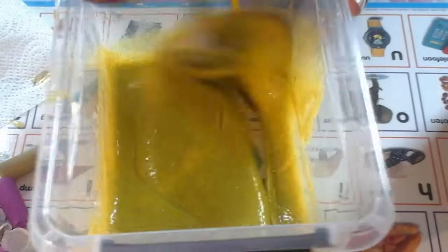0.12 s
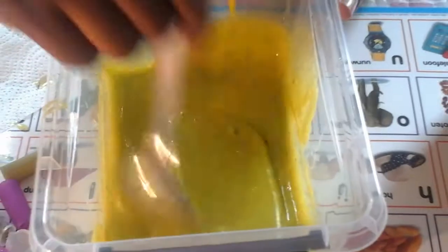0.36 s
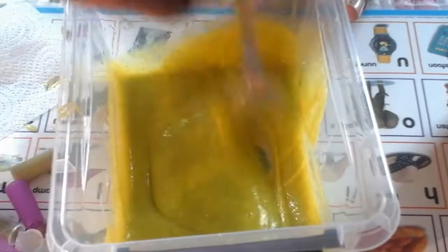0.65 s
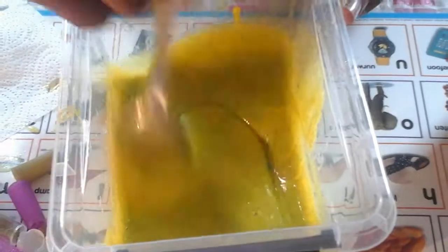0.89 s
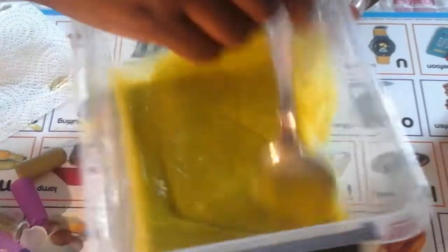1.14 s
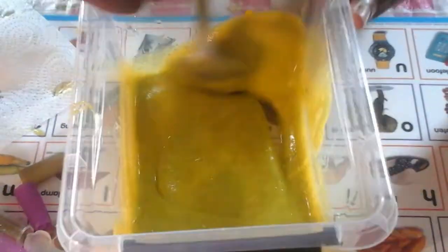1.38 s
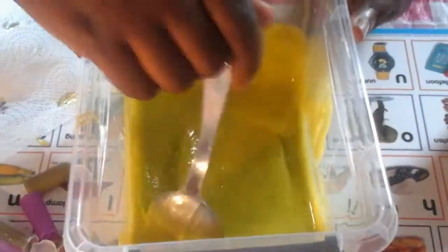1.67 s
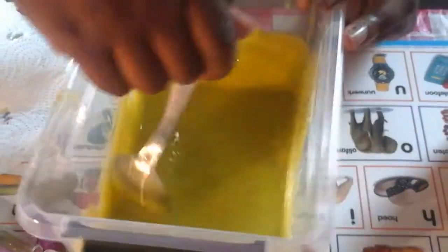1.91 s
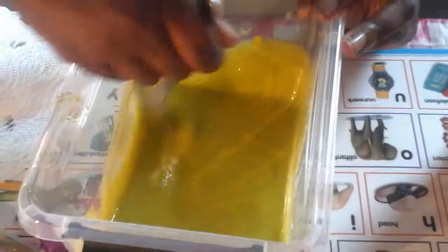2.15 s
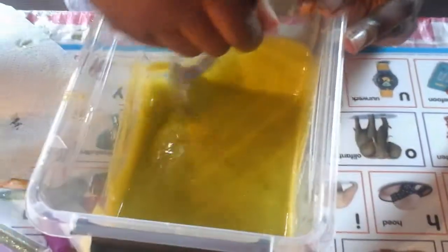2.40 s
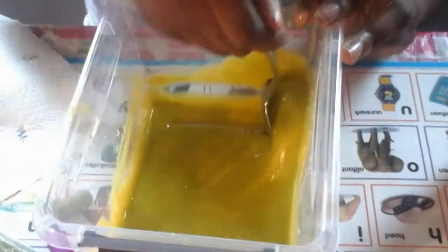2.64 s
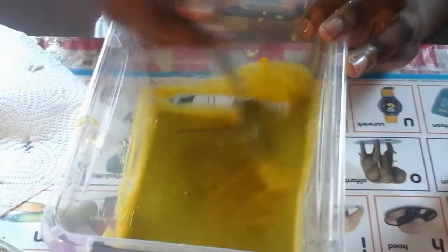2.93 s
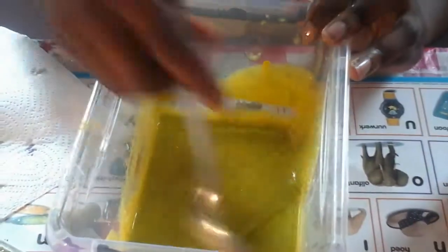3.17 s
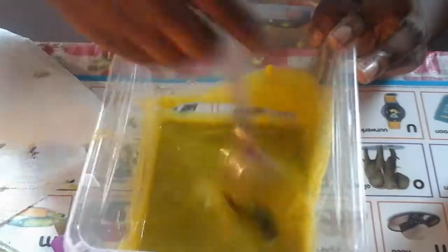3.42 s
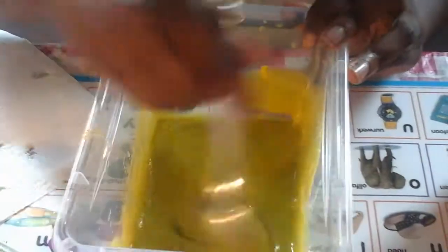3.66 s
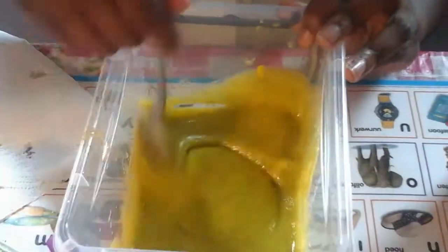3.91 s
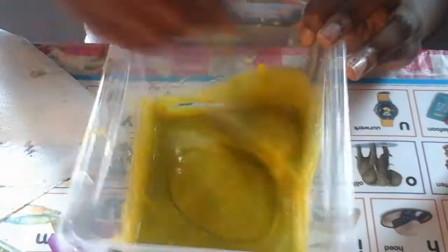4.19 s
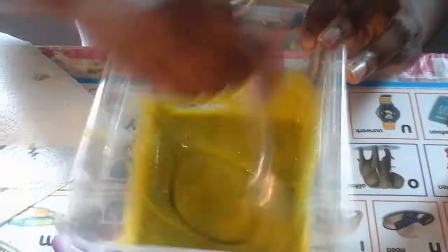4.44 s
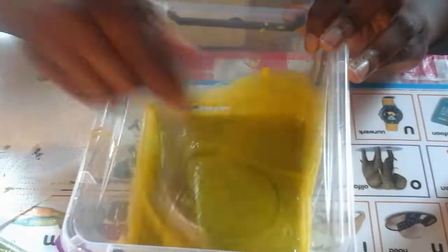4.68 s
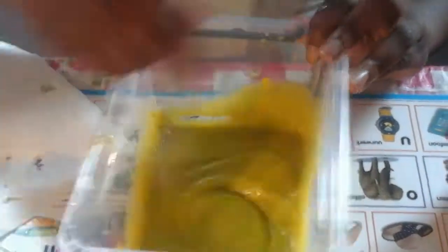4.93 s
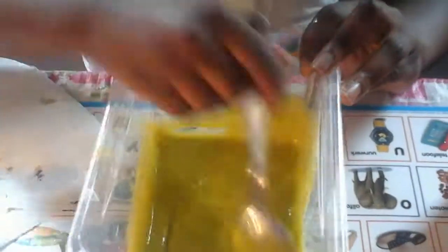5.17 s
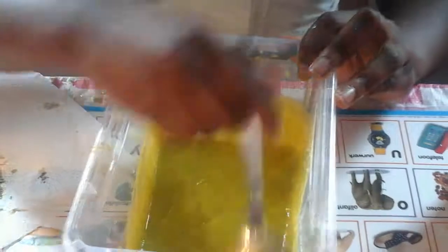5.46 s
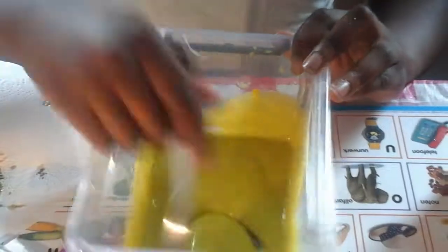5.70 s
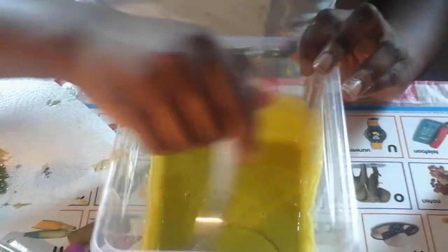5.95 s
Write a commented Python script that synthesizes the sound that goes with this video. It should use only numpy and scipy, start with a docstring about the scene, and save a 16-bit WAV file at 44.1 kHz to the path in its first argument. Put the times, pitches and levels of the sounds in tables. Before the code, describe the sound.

Close, dry indoor sound of slime being stirred with a spoon. Irregular taps on thin plastic, some sharp and some dull and boomy, come with sticky crackles and gooey sucking noises. A vigorous opening gives way to sparse, softer touches, then a short lull; renewed knocks and squelches follow, peaking a little after four seconds and staying busy, over a faint wavering hum.

```python
"""A metal spoon stirs runny slime in a plastic tub on a table, close to a small microphone.
Its blows excite decaying modes of floor, walls and panels; its edge ticks, crackles and hisses as
filtered noise. The slime squelches as noise through damped modes, with popping air pockets.
A faint wavering low hum and coloured room noise lie under it."""
import sys
import numpy as np
from scipy import signal
from scipy.fft import rfft, irfft
from scipy.io import wavfile
from scipy.ndimage import uniform_filter1d

SR = 44100
rng = np.random.default_rng(int(sys.argv[2]) if len(sys.argv) > 2 else 0)


def natural_amplitude(level_db):
    """Convert a level in decibels to a linear amplitude factor, elementwise."""
    exponent = np.asarray(level_db, float) / 20
    return 10 ** exponent


def master_out(mix):
    """Clip the mix to full scale and print it as 16-bit PCM to the path in sys.argv[1]."""
    frames = np.transpose(np.atleast_2d(mix))
    ceiling = np.clip(frames, -1, 1)
    pcm = np.round(ceiling * 32767).astype(np.int16)
    wavfile.write(sys.argv[1], SR, pcm)


N = 268128
TIME = np.arange(N) / SR

# Stirring: t/s, nominal edge hiss level/dB, nominal slime squelch level/dB
STIRRING = [(0, -66, -72), (.25, -64, -64), (.54, -66.5, -73), (.98, -61.5, -61.5), (1.32, -58.5, -61),
            (1.73, -73.5, -74), (1.8, -83, -80), (1.87, -75, -77), (2.44, -78.5, -73), (2.54, -68, -63),
            (2.75, -71, -68.5), (3.01, -94, -91.5), (3.34, -99, -93.5), (3.36, -79, -79.5),
            (3.89, -74.5, -72), (4.05, -60, -63), (4.2, -55, -57.5), (4.45, -69, -75), (5.0, -67.5, -67.5),
            (5.27, -65, -63), (5.52, -74, -72.5), (5.95, -71, -67.5), (6.08, -81, -83)]
# Modes of the slime-loaded floor, the long walls, then the small panels:
# f/Hz, relative level/dB, t60/s before the slime damps them further
TUB_MODES = [(110.5, 0, 0.13), (156.7, 1, 0.29), (195.2, 0.5, .15), (236.5, -2.5, 0.14), (291.4, -2, 0.1),
             (352.4, -6, 0.13), (437, -8, 0.13), (503.6, -8.5, 0.11), (579, -13, 0.17), (617.3, -7, 0.15),
             (659.5, -6, 0.14), (723, -3.5, 0.2), (803.7, -6.5, 0.13), (901, -11, 0.13), (974, -16, 0.12),
             (1054, -9.5, 0.13), (1174, -7, .09), (1252, -12.5, 0.2), (1335, -8.5, 0.072),
             (1500, -17.5, 0.092), (1700, -18, 0.13)]
# Relative spectrum of edge contact: f/Hz, level/dB (per Hz)
CONTACT_SPECTRUM = [(530, -24.5), (900, -6.5), (1120, -11), (1310, -12.5), (1580, -19), (2170, -6),
                    (3160, -17), (3930, -9), (4800, -1.5), (5090, -8.5), (6010, -20.5), (7000, -27.5),
                    (9000, -35.5), (12000, -45), (15500, -54.5)]
# Relative spectrum of the room noise: f/Hz, level/dB (per Hz)
ROOM_SPECTRUM = [(60, -8), (124, -12), (229, -15.5), (470, -20), (550, -32.5), (704, -26), (1400, -46.5),
                 (3000, -46), (4700, -51.5), (7000, -48.5), (15000, -48.5)]
# Spoon edge catching and slime snapping: t/s, nominal middle-band level/dB,
# body level/dB above it, sharpness level/dB above it, tail t60/s
TICKS = [(0.0373, -54, -18, -11, 0.15), (0.118, -45, -1.5, -37, 0.068), (0.16, -58, -11, -20, 0.13),
         (0.2004, -44.5, -7, -16, 0.087), (0.2329, -44, -9, -21, 0.09), (0.2714, -45, 8, -25, 0.15),
         (0.292, -48, -13, -22, 0.22), (0.5658, -51, 3, -39, 0.12), (0.603, -49.5, 9.5, -35, 0.16),
         (0.6828, -48, -2.5, -35, 0.12), (0.7, -40, 4.5, -38, 0.076), (0.7721, -46, -17, -16, 0.12),
         (0.815, -44.5, -14, -25, 0.11), (0.883, -40, 6, -40, 0.1), (0.9961, -40.5, 3.5, -33, 0.097),
         (1.057, -53, -3, -26, 0.11), (1.0849, -58, -6, -24, 0.11), (1.1505, -28.5, 3.5, -25, 0.12),
         (1.3312, -39, -13, -20, 0.14), (1.3578, -38.5, -6, -21, 0.16), (1.3675, -29, -4.5, -20, 0.11),
         (1.425, -36, -1.5, -18, 0.16), (1.4478, -35.5, -15, -30, 0.052), (1.5248, -48.5, 2, -26, 0.21),
         (1.85, -58.5, 1.5, -28.5, 0.13), (2.0119, -48.5, -4.5, -27.5, 0.17), (2.167, -49, -9.5, -30, 0.11),
         (2.215, -42, -7.5, -31, 0.34), (2.2719, -42.5, -15, -33, 0.057), (2.5376, -49.5, -7, -27, 0.33),
         (2.613, -56.5, -2, -31, 0.16), (2.694, -32.5, -9.5, -28.5, 0.077), (2.8878, -55.5, -6, -28, 0.13),
         (3.3496, -57.5, 1.5, -34.5, 0.34), (3.605, -53, -3, -34, 0.12), (3.6565, -56, -2, -36, 0.14),
         (3.8082, -37, -1.5, -38, 0.14), (3.851, -47.5, -4, -10, 0.15), (3.9454, -44, -2.5, -21, 0.23),
         (3.9792, -40.5, -13, -20, 0.12), (4.0113, -40.5, -19, -30, 0.047), (4.184, -33, -18, -46, 0.19),
         (4.3062, -32.5, -6.5, -27, 0.25), (4.5405, -44.5, -1, -41, 0.17), (4.5848, -38.5, -8, -26, 0.1),
         (4.6094, -42.5, -10, -8.5, 0.14), (4.6577, -38, -7.5, -23, 0.11), (4.7055, -38, -9, -16, 0.11),
         (4.805, -42.5, -5, -35, 0.049), (4.8787, -38, 0, -47, 0.22), (5.041, -44, -20, -38, 0.1),
         (5.109, -45, -5, -42, 0.077), (5.1756, -42.5, 4, -36, 0.052), (5.2088, -33, -8.5, -40, 0.15),
         (5.2414, -39, 0.5, -19, 0.18), (5.3898, -43, -1.5, -30, 0.38), (5.5646, -40.5, 3, -41, 0.16),
         (5.5837, -42.5, -8, -39, 0.17), (5.7778, -37, -12, -20.5, 0.42), (5.8761, -44, -9, -27, 0.17),
         (5.9099, -31, -11.5, -39, 0.098)]
# Spoon against the tub: t/s, nominal large-panel level/dB, then level/dB above it of
# floor boom, wall ring and small panels
KNOCKS = [(.115, -57, -9, -6, 6.5), (0.158, -60, -5, 11, -9), (.2, -32, -27, 1.5, -13.5),
          (.271, -32.5, -1, -2, -5), (.603, -41, 10, -2.5, 0), (.7, -64.5, -11, 1, 3),
          (.773, -54.5, -1, 10.5, -1.5), (.814, -36, -15, 3, -11), (.887, -31, -3, -8.5, -7),
          (0.999, -42, -28, -18, 1), (1.098, -50, -18, 2, 1), (1.151, -28.5, 1.5, -4, -0.5),
          (1.368, -21.5, -25, -2, -3), (1.434, -44, -17, 9.5, -0.5), (1.861, -65, -4.5, 9.5, -6),
          (2.014, -54.5, -7, -5, -6.5), (2.245, -54, -6, 4, -5.5), (2.276, -45, 0, 2.5, -11),
          (2.572, -47.5, -23, -9, -6), (2.614, -62, -8, 1, 3), (2.697, -39, -7, 5, -8),
          (2.887, -59.5, -3, 2.5, -4), (3.354, -49, 12.5, 0.5, -3), (3.433, -67, -21, -5, 7),
          (3.606, -54, 9.5, 0, -10), (3.656, -57.5, -3, 4, -4), (3.808, -33, 2, -6.5, -7),
          (3.945, -39, -4, -1.5, -8), (4.05, -55, 3, 8, -17), (4.182, -32, -1, -7, -5),
          (4.311, -36, -1.5, -4, -4), (4.404, -52.5, -1, -1.5, -10), (4.538, -37.5, -2.5, -6, -11.5),
          (4.605, -54.5, 0, -10, 2.5), (4.712, -56.5, -16, -0.5, -6), (4.88, -37.5, 6, 0, -0.5),
          (5.035, -69.5, -4.5, 12.5, -14), (5.103, -66, -9, 9.5, -9), (5.172, -64, -8, 1, 6),
          (5.209, -29.5, -7, -4.5, -15), (5.245, -54, -5, 8.5, 8.5), (5.435, -61.5, -13, -18, 6.5),
          (5.564, -42.5, 7, -0.5, 1.5), (5.785, -43.5, -13, -0.5, -5), (5.868, -54, -16, -9, 1.5),
          (5.907, -54, -15, -18, 0.5)]

BODY_TOP_HZ, SHARP_FROM_HZ = 3150, 6700  # band edges of the contact noise
FLOOR_TOP_HZ, WALL_TOP_HZ, LARGE_TOP_HZ, MIDDLE_TOP_HZ = 130, 260, 530, 860  # groups of tub modes
USUAL_DB = -68  # reference level of hiss and squelch


def level(x, db):
    """Normalization: scale a signal to an rms level in dB."""
    return x * natural_amplitude(db) / np.sqrt(np.mean(x ** 2))


def curve(table):
    """Linear interpolation of table columns over time."""
    times, *columns = np.transpose(table)
    return [np.interp(TIME, times, column) for column in columns]


def colour(x, spectrum, low_hz=0, high_hz=SR):
    """Minimum-phase filtering: a folded cepstrum gives a causal response to a band of a spectrum."""
    hz = np.maximum(np.fft.rfftfreq(2048, 1 / SR), 1)
    points_hz, points_db = np.transpose(spectrum)
    octaves_outside = np.maximum(np.log2(np.maximum(low_hz / hz, hz / high_hz)), 0)
    response_db = np.interp(np.log(hz), np.log(points_hz), points_db)
    response_db = response_db - np.minimum(60 * octaves_outside, 60)
    cepstrum = irfft(response_db * np.log(10) / 20)
    cepstrum[1:1024] *= 2
    cepstrum[1025:] = 0
    impulse_response = irfft(np.exp(rfft(cepstrum)))
    return signal.fftconvolve(x, impulse_response)[:N]


def walk(rate_hz):
    """Slow fluctuation: independent normal values, rate_hz per second, joined by straight ramps."""
    hold = int(SR / rate_hz)
    steps = np.repeat(rng.standard_normal(N // hold + 1), hold)
    return uniform_filter1d(steps, hold)[:N]


def add(out, start_s, sound):
    """Superposition: mix a short sound in at a time."""
    i = int(start_s * SR)
    out[i:i + len(sound)] += sound[:N - i]


def ring_modes(force, modes, damping):
    """Driven resonance: two-pole modes answer a force; slime multiplies their t60 by damping."""
    out = 0
    for hz, db, t60 in modes:
        radius = np.exp(-np.log(1000) / (damping * t60 * SR))
        angle = 2 * np.pi * hz / SR
        poles = [1, -2 * radius * np.cos(angle), radius ** 2]
        out = out + natural_amplitude(db) * np.sin(angle) * signal.lfilter([1], poles, force)
    return out


def bubbles(low_hz=600, octaves=2.2, decay_cycles=2.6, glide=0.029, spread_db=6.0, count=900):
    """Bubble resonance: air pockets in the slime pop as damped blips that rise a little."""
    out, t = np.zeros(N), TIME[:SR // 20]
    for when, pitch, size in rng.random((count, 3)):
        cycles = low_hz * 2 ** (octaves * pitch) * t
        tone = np.sin(2 * np.pi * cycles * (1 + glide * cycles / 2))
        pop = tone * np.exp(-cycles / decay_cycles)
        add(out, when * N / SR, natural_amplitude(-spread_db * np.log(1 - size)) * pop)
    return out


def drag(grain_db=3.0, flicker_db=2.5, wet_db=5.0):
    """Stick-slip friction: uneven slips hiss and shake the tub; sucking slime rings its small panels."""
    hiss_db, squelch_db = curve(STIRRING)
    rumble_db = -61 + 0.64 * (squelch_db - USUAL_DB)  # dB per dB of squelch
    # the edge scrapes harder round each tick
    scrape_db, rise_s, fade_s = -24.5, 0.0037, 0.032
    scrape = np.zeros(N)
    for s, db, *_ in TICKS:
        rise_and_fade = np.exp(np.minimum((TIME - s) / rise_s, (s - TIME) / fade_s))
        scrape += natural_amplitude(db + scrape_db) * rise_and_fade

    unevenness = natural_amplitude(grain_db * walk(500) + flicker_db * walk(49))
    slips = rng.standard_normal((3, N)) * unevenness
    hiss = level(colour(slips[0], CONTACT_SPECTRUM, BODY_TOP_HZ), 0)

    sucking = slips[1] * natural_amplitude(wet_db * walk(60))
    small_modes = [mode for mode in TUB_MODES if mode[0] > LARGE_TOP_HZ]
    squelch = level(ring_modes(sucking, small_modes, 0.41), -1.5)
    squelch = squelch + level(colour(sucking, CONTACT_SPECTRUM, 0, BODY_TOP_HZ), -5.5)
    squelch = squelch + level(bubbles(), -8.0)

    large_modes = [mode for mode in TUB_MODES if mode[0] < LARGE_TOP_HZ]
    rumble = level(ring_modes(slips[2], large_modes, 0.15), 0)
    return hiss * (natural_amplitude(hiss_db) + scrape) + squelch * natural_amplitude(squelch_db) + rumble * natural_amplitude(rumble_db)


def background():
    """Tone and noise: a wavering hum that follows the squelch level, over steady coloured room noise."""
    squelch_db = curve(STIRRING)[1]
    hum_db = -66.5 + 0.35 * (squelch_db - USUAL_DB) + 2.6 * walk(3.0)
    hum_hz = 47.5 + 0.24 * walk(5.4)
    hum = np.sqrt(2) * natural_amplitude(hum_db) * np.sin(2 * np.pi * np.cumsum(hum_hz) / SR)
    return hum + level(colour(rng.standard_normal(N), ROOM_SPECTRUM), -72.5)


def crackles(count=280):
    """Random adhesion breaks: rows of small sticky ticks, louder when the edge drags harder."""
    offset_db, spread_db, slope = 0.5, 4, 0.8  # slope: dB of crackle per dB of hiss
    body_db, sharp_db, t60_s = 0, -32.5, 0.044
    still_db = -86  # below this hiss the spoon hardly moves and nothing crackles
    when, size = rng.random((count, 2)).T
    seconds = when * N / SR
    times, hiss_db, _ = np.transpose(STIRRING)
    hiss_then_db = np.interp(seconds, times, hiss_db)
    db = USUAL_DB + slope * (hiss_then_db - USUAL_DB) + offset_db
    db = db - spread_db * np.log(1 - 0.95 * size)
    return [(s, tick_db, body_db, sharp_db, t60_s)
            for s, tick_db, hiss in zip(seconds, db, hiss_then_db) if hiss > still_db]


def ticks(crack_s=0.00087, tail_db=-8.0, gains_db=(-5.0, -4.0, -3.0), ring_db=12.0,
          ring_width_hz=330, burst_db=3.0):
    """Impulsive contact: a crack and tail of bursty noise also ring a small spot of plastic."""
    spot_hz, spot_spread_hz = 2320, 220  # pitch of the spot under the edge
    envelopes, out = np.zeros((3, N)), np.zeros(N)  # envelopes: body, middle, sharp
    noise = rng.standard_normal((4, N)) * natural_amplitude(burst_db * walk(150))
    rows = list(TICKS) + crackles()
    pitches_hz = spot_hz + spot_spread_hz * rng.standard_normal(len(rows))
    for (s, db, body_db, sharp_db, t60), hz in zip(rows, pitches_hz):
        t = TIME[:int(t60 * SR)]
        shape = np.exp(-t / crack_s) + natural_amplitude(tail_db) * np.exp(-np.log(1000) * t / t60)
        for envelope, relative_db in zip(envelopes, (body_db, 0, sharp_db)):
            add(envelope, s, natural_amplitude(db + relative_db) * shape)
        push = shape * np.take(noise[3], int(s * SR) + np.arange(len(t)), mode="wrap")
        spot = signal.iirpeak(hz, hz / ring_width_hz, SR)
        spot_ring = signal.lfilter(*spot, signal.lfilter(*spot, push))
        add(out, s, natural_amplitude(db + body_db + ring_db) * spot_ring)

    bands = ((0, BODY_TOP_HZ), (BODY_TOP_HZ, SHARP_FROM_HZ), (SHARP_FROM_HZ, SR))
    for envelope, grit, (low, high), db in zip(envelopes, noise, bands, gains_db):
        unit = np.std(colour(grit, CONTACT_SPECTRUM, low, high))
        out = out + natural_amplitude(db) * colour(grit * envelope, CONTACT_SPECTRUM, low, high) / unit
    return out


def knocks(scatter_db=5.0, scatter_hz=500, rise_cycles=0.18, smother_s=0.069, smother_db=12.5):
    """Modal excitation: each blow rings floor, walls and panels, every mode at its own level."""
    smallest_db = -1.5  # the smallest panels take less of each blow
    detune, panel_detune, panel_blur_hz = 0.014, 0.025, 28  # detune as a fraction of f
    out, t = np.zeros(N), TIME[:SR // 6]
    hz, mode_db, t60 = np.transpose(TUB_MODES)[:, :, None]
    part = np.digitize(hz, (FLOOR_TOP_HZ, WALL_TOP_HZ, LARGE_TOP_HZ, MIDDLE_TOP_HZ))
    is_panel = part > 1
    # slime cushions the touch; low modes build up later
    rise = 1 - np.exp(-t * hz / rise_cycles)
    # slime flows back and mutes the ring
    smother = natural_amplitude(-smother_db * (1 - np.exp(-(t / smother_s) ** 4)))
    shape = rise * np.exp(-np.log(1000) * t / t60) * smother
    # random level spread per mode, growing with frequency up to scatter_hz
    scatter = scatter_db * np.minimum(hz / scatter_hz, 1)
    detuning = np.where(is_panel, panel_detune, detune)
    step_spread = np.sqrt(2 * np.pi * panel_blur_hz * 50 / SR)  # radians per 50 samples
    chance = rng.standard_normal((len(KNOCKS), 3, len(TUB_MODES), 1))
    for (s, db, boom, wall, small), (strength, pitch, side) in zip(KNOCKS, chance):
        part_db = np.array([boom, wall, 0, small, small + smallest_db])[part]
        gain = natural_amplitude(db + part_db + mode_db + scatter * strength) * np.sign(side)
        # wobbling slime blurs the pitch of the panels: a random walk of phase
        steps = rng.standard_normal((len(TUB_MODES), len(t) // 50)) * step_spread
        wobble = is_panel * np.repeat(steps / 50, 50, axis=1).cumsum(axis=1)
        phase = 2 * np.pi * hz * (1 + detuning * pitch) * t + wobble
        add(out, s, (gain * np.sin(phase) * shape).sum(0))
    return out


def scene():
    """Superposition at one microphone; the small tub radiates no deep bass."""
    radiation = signal.butter(6, 70.8, "high", fs=SR, output="sos")  # Hz
    tub = signal.sosfilt(radiation, drag() + ticks() + knocks())
    return (tub + background())[None]


def roll_off(x):
    """The treble ends steeply here."""
    return signal.sosfilt(signal.butter(12, 15480, fs=SR, output="sos"), x)


def record(dry):
    """High-pass response: the microphone drops the deepest bass."""
    microphone = signal.butter(8, 39.5, "high", fs=SR, output="sos")  # Hz
    heard = signal.sosfilt(microphone, dry)
    return roll_off(heard)


dry = scene()
out = record(dry)
master_out(out)
```